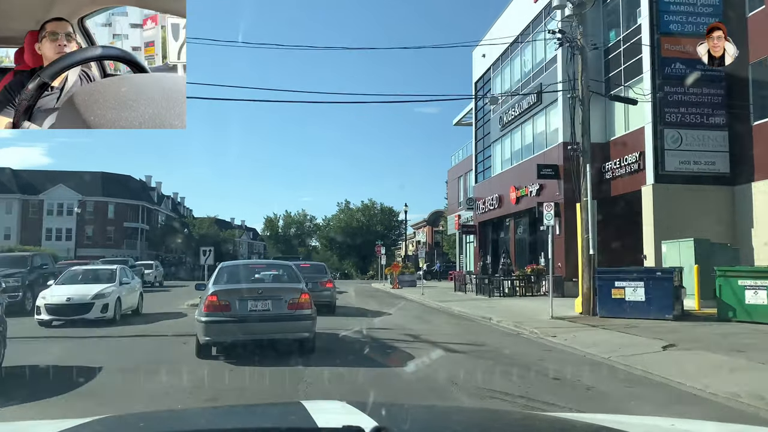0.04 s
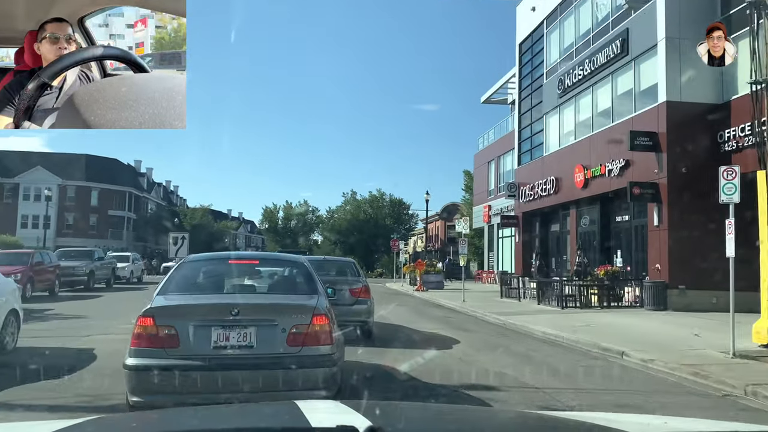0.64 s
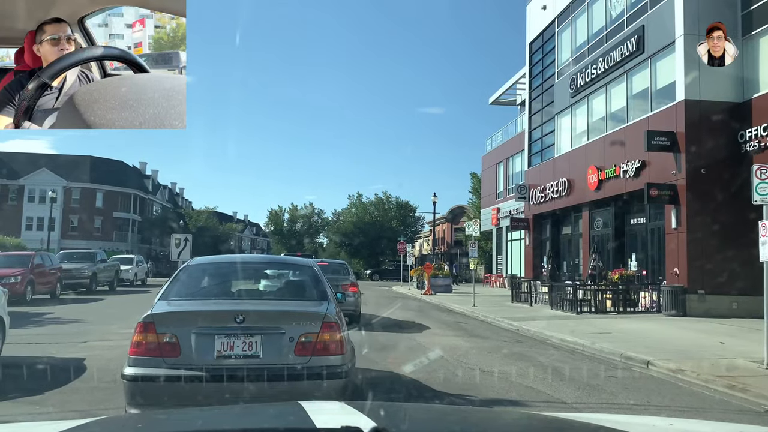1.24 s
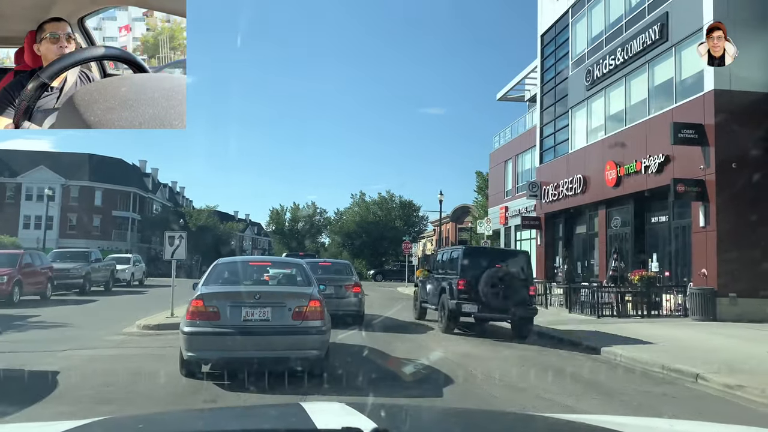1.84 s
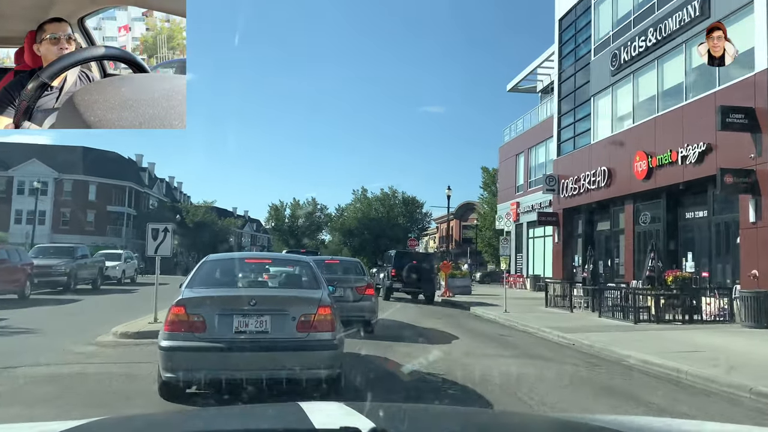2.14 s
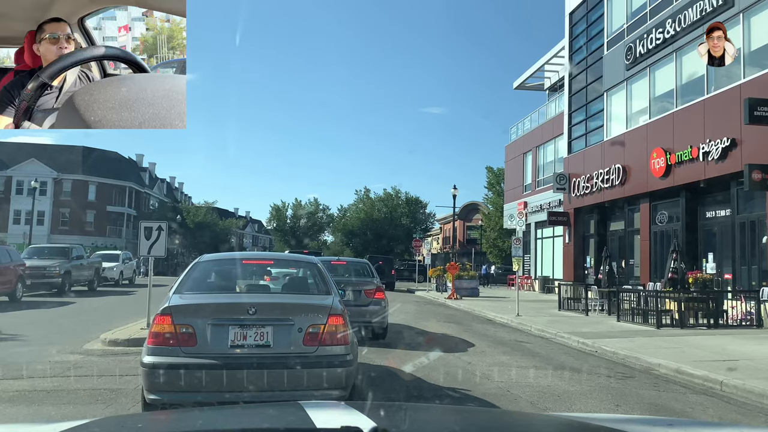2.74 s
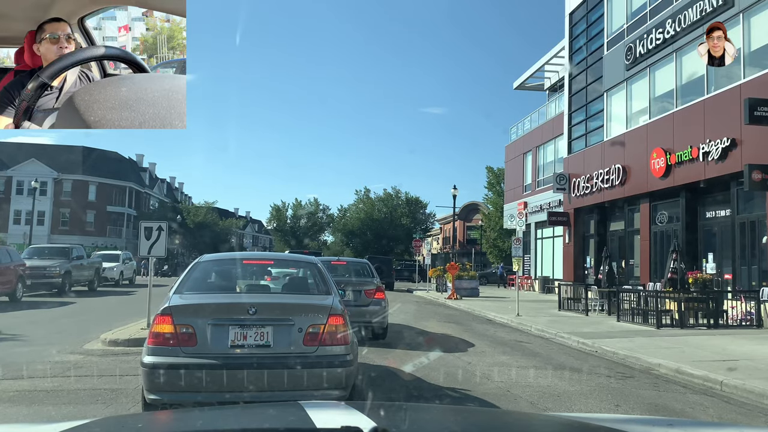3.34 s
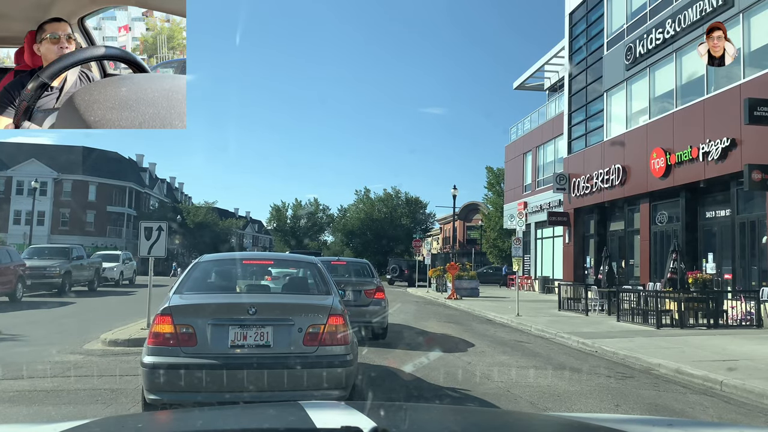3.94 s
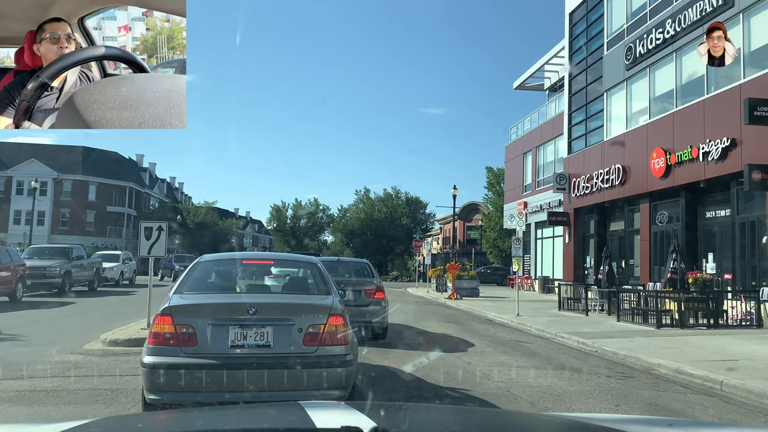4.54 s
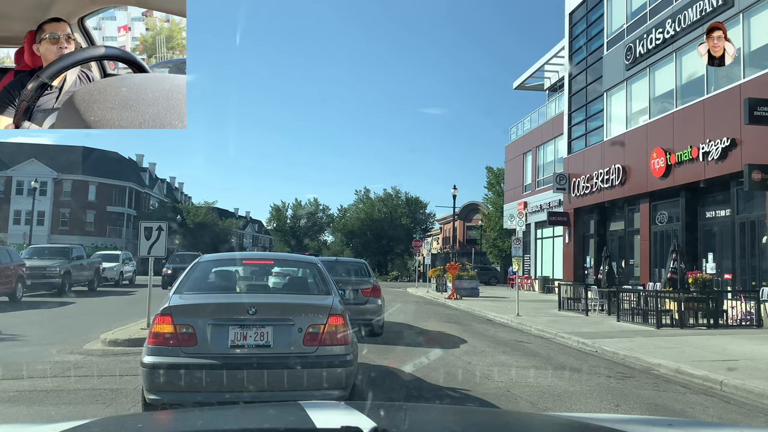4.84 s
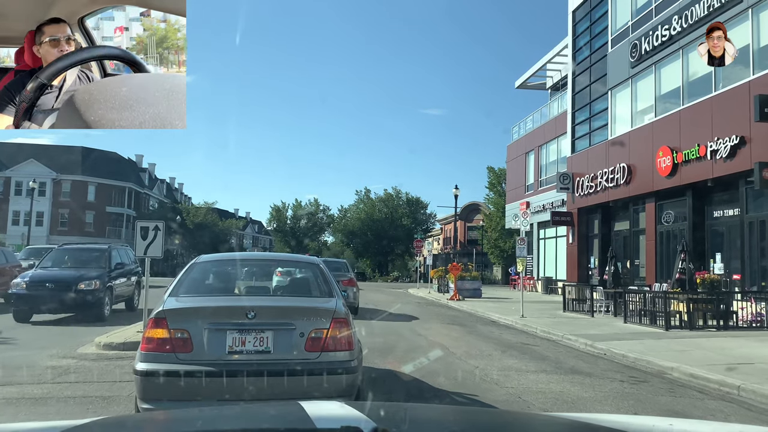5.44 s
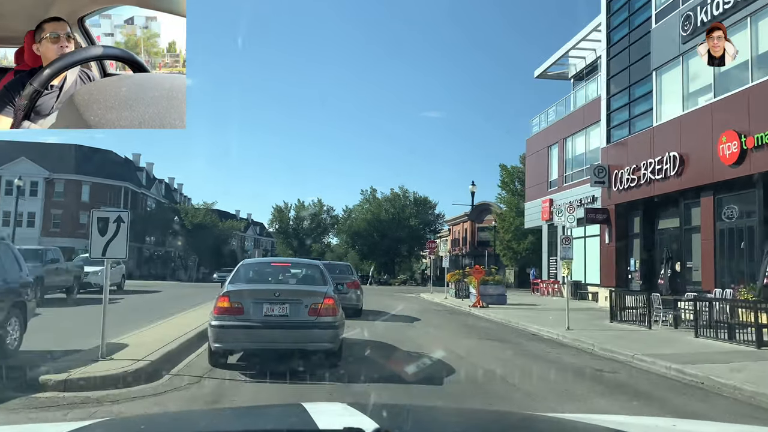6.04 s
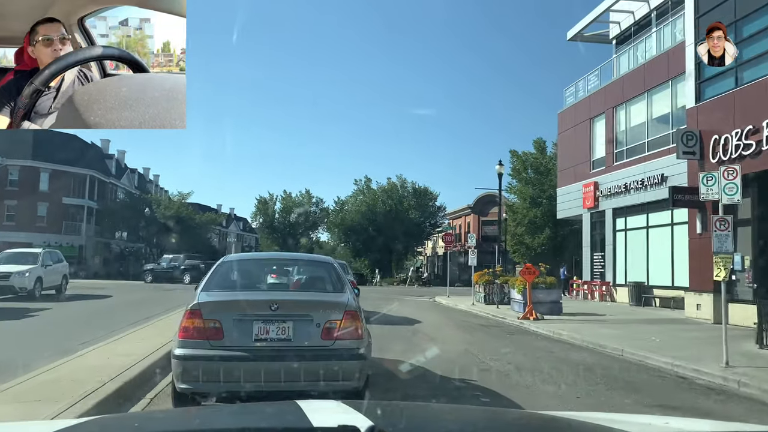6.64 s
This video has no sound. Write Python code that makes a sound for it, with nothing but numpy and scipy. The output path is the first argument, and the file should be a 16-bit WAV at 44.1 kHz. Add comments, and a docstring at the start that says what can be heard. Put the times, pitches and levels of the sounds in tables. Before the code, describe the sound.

Inside a creeping car, a steady engine hum swells twice over road rumble and vent air, with controls clicking close by.

```python
"""Car cabin in town traffic

Stereo, from inside a creeping car: the engine idles, is blipped once, then pulls away and drops back.
Its speed sets the throttle, the hum, the intake rush and how hard it rocks the body. Road rumble and
vent air lie beneath, with soft rustles and brake moans. Close to the microphone the controls knock
and click, and something electronic ticks faintly and very high at a fixed rate."""
import sys
import numpy as np
from scipy import signal
from scipy.fft import rfft, irfft, next_fast_len
from scipy.io import wavfile
from scipy.ndimage import uniform_filter1d

SR = 44100
rng = np.random.default_rng(int(sys.argv[2]) if len(sys.argv) > 2 else 0)


def inscribe(sig):
    """Save sig as 16-bit PCM at rate SR to the path in sys.argv[1].

    A 1-D sig is mono; a 2-D sig holds one channel per row.
    Samples are clipped to [-1, 1] before scaling.
    """
    pcm = np.round(np.clip(np.atleast_2d(sig).T, -1, 1) * 32767)
    wavfile.write(sys.argv[1], SR, pcm.astype(np.int16))


N = 295470
T = np.arange(N) / SR
IDLE_HZ, CYLINDERS = 53, 8  # firing rate at idle; firings per engine cycle

# spectrum of throttle hiss and rustles: f/Hz, relative level/dB
HISS_SPECTRUM = [(300, -26), (2000, 7), (4500, -3), (6000, -5), (9000, -9), (12000, -16.5), (16000, -14)]


def undb(db):
    """Decibels to gain."""
    return 10 ** (np.asarray(db) / 20)


def unit(x):
    """Scale to rms 1."""
    return x / np.sqrt(np.mean(x ** 2))


def at(points, hz):
    """Read (f/Hz, value) points on a log-frequency axis."""
    f, value = np.transpose(points)
    return np.interp(np.log(np.maximum(hz, 1)), np.log(f), value)


def colour(x, points):
    """Filter by (f/Hz, gain/dB) points."""
    size = next_fast_len(N)
    gain = undb(at(points, np.arange(size // 2 + 1) * SR / size))
    return irfft(rfft(x, size) * gain, size)[..., :N]


def walk(rate):
    """Smooth random drift that turns about rate times a second; spread near 1."""
    k = max(int(SR / rate), 2)
    start = rng.integers(k)
    steps = np.repeat(rng.standard_normal(N // k + 2), k)
    return 1.112 * uniform_filter1d(steps, k)[start:start + N]


def curve(table):
    """Join (t/s, value) points, sample by sample."""
    return np.interp(T, *np.transpose(table))


def swells(table):
    """Gain of bell-shaped swells from rows of peak t/s, length/s, level/dB."""
    return sum(undb(db) * np.exp(-2 * ((T - s) / length) ** 2) for s, length, db in table)


def add(track, s, sound):
    """Mix a sound into a track at s seconds."""
    part = track[..., int(s * SR):][..., :sound.shape[-1]]
    part += sound[..., :part.shape[-1]]


def diffuse(spectrum):
    """Noise filling the cabin: narrow in the upper bass, wide in the treble, ringing in the trim."""
    # faint resonances of ducts and trim: f/Hz, width/Hz, boost/dB
    trim = [(1538, 150, 4), (1956, 89, 5.5), (2450, 65, 1.5), (3030, 120, 5.5), (3565, 190, 5.5),
            (4150, 260, 3), (4840, 120, 4)]
    # width of the sound field: f/Hz, side minus mid/dB
    stereo_width = [(30, 2.5), (80, -11), (120, -27), (210, -37), (300, -27.5), (420, -2.5), (650, -11.5),
                    (1000, -6), (1250, 2.5), (1700, -2.5), (2600, 7), (4400, 5.5), (8000, -1), (16000, 0)]
    hz = np.geomspace(20, SR / 2, num=1000)
    rings_db = sum(db * np.exp(-2 * ((hz - f) / width) ** 2) for f, width, db in trim)
    mid, side = colour(rng.standard_normal((2, N)), np.transpose([hz, at(spectrum, hz) + rings_db]))
    side = colour(side, stereo_width)
    return unit(np.array([mid + side, mid - side]))


def vent_air(level_db=-60):
    """Steady air from the vents, all round the microphone."""
    # air noise: f/Hz, relative level/dB
    spectrum = [(25, -4.5), (85, -7), (130, 15.5), (190, 7), (600, 10.5), (1500, -6.5), (3000, -26.5),
                (4200, -29.5), (6000, -48), (7300, -24), (8100, -28.5), (9000, -53.5), (11000, -44),
                (16000, -47)]
    return undb(level_db) * diffuse(spectrum)


def rustles(crackle_db=4.5):
    """Soft rustles in the cabin: swells of hiss with a fast flicker."""
    # rustles: peak t/s, length/s, level/dB
    events = [(1.15, 0.41, -70), (5.31, 0.035, -66), (5.38, .1, -72.5), (5.58, 0.19, -72),
              (6.45, 0.071, -72), (6.65, 0.045, -67.5)]
    return swells(events) * undb(crackle_db * walk(120)) * diffuse(HISS_SPECTRUM)


def rumble(climb, roll, shudder, still_db=-57, road_db=-52, rise_db=-59, fall_db=-52, judder_db=1):
    """The body shakes a little at rest, more as the tyres roll, most as falling revs rock the engine."""
    # body rumble: f/Hz, relative level/dB
    spectrum = [(30, -38.5), (85, -46.5), (120, -22), (165, -6), (195, -4), (235, -0.5), (290, -1),
                (385, -4.5), (460, -8.5), (600, -15.5), (1000, -23.5), (2000, -40), (5000, -69)]
    rocking = undb(np.where(climb > 0, rise_db, fall_db)) ** 2 * np.abs(climb)
    power = undb(still_db) ** 2 + (undb(road_db) * roll) ** 2 + rocking + shudder ** 2
    return diffuse(spectrum) * np.sqrt(power) * undb(judder_db * walk(22.45))


def ticking(level_db=-50, weak_db=-4, burst_s=0.0043, tail_db=-11, tail_s=0.005, uneven_db=2.27):
    """Short, very high electronic bursts, strong and weak in turn."""
    # one tick: f/Hz, gain/dB
    spectrum = [(2500, -37), (4000, -7.5), (7000, -20), (9700, -10), (11300, -20), (12400, -9.5),
                (13200, -4.5), (14100, -15), (14700, 10.5), (15100, 5), (15700, 9.5), (16300, -19)]
    # width from reaching the two channels out of step: f/Hz, side minus mid/dB
    stereo_width = [(4000, 4.5), (8000, 0), (13200, -5), (14500, -0.5), (15600, 4.5)]
    first_s, gap_s, period_s = .0278, .0758, .14998
    gate = np.zeros(N)
    for start, db in ((first_s, 0), (first_s + gap_s, weak_db)):
        age = (T - start) % period_s
        tail = undb(tail_db) * np.exp(-np.abs(age - burst_s) / tail_s)
        gate += undb(db) * np.where(age < burst_s, 1, tail)
    left = colour(gate * undb(uneven_db * walk(10)) * rng.standard_normal(N), spectrum)
    shift_rad = 2 * np.arctan(undb(at(stereo_width, np.arange(N // 2 + 1) * SR / N)))
    right = irfft(rfft(left) * np.exp(1j * shift_rad), N)
    return undb(level_db) * np.array([left, right])


def brake_moans(wobble_rad=0.56):
    """A dragging brake pad sings one soft, unsteady note that glides."""
    # moans: peak t/s, length/s, level/dB, f/Hz, glide/(Hz per s)
    events = [(1.02, 0.1, -49.5, 523, -100), (2.916, 0.032, -51, 571.7, 800)]
    drift = wobble_rad * walk(60)
    out = np.zeros(N)
    for s, length, db, hz, glide in events:
        phase = 2 * np.pi * (hz + glide * (T - s) / 2) * (T - s)
        out += np.sqrt(2) * swells([(s, length, db)]) * np.sin(phase + drift)
    return out


def body_booms(wobble_rad=0.81):
    """A low body resonance swells briefly and unsteadily as the engine rocks on its mounts."""
    # booms: peak t/s, length/s, level/dB, f/Hz
    events = [(0.016, 0.035, -36.5, 200.3), (0.09, 0.064, -40.5, 240), (0.216, .02, -38.5, 247),
              (1.65, 0.077, -43, 240.3), (5.322, 0.027, -36.5, 204.2), (5.622, 0.032, -35, 244),
              (5.76, 0.026, -34.5, 215), (5.88, .05, -39, 212.3), (6.009, 0.024, -34.5, 262)]
    drift = wobble_rad * walk(60)
    return sum(np.sqrt(2) * swells([(s, length, db)]) * np.sin(2 * np.pi * hz * (T - s) + drift)
               for s, length, db, hz in events)


def blow(thud_db, middle_db, snap_db, pan_db, thud_hz=680, clack_hz=1130, snap_s=0.008,
         scatter=0.034, scatter_s=0.0078, attack_s=0.00099):
    """A blow rings the console and snaps; near surfaces scatter the ring. Gives stereo (ring, snap)."""
    # console modes: f/Hz, relative level/dB, t60/s
    console = [(256, -4.5, 0.047), (441, -17.5, 0.11), (595, -1, 0.036), (802, -0.5, 0.0048),
               (886, 4.5, 0.013), (1013, 2.5, 0.014), (1160, 12, 0.0096), (1284, -5, 0.014),
               (1510, -11.5, 0.025)]
    t = T[:SR // 5]
    hz, db, t60 = np.transpose(console)
    tuned = hz * (1 + 0.018 * rng.standard_normal(len(hz)))
    modes = np.sin(2 * np.pi * tuned[:, None] * t) * np.exp(-np.log(1000) * t / t60[:, None])
    gains = undb(db + np.select([hz < thud_hz, hz < clack_hz], [thud_db, middle_db]))
    onset = 1 - np.exp(-(t / attack_s) ** 2)  # the attack is softened over about a millisecond
    ring = gains @ modes * onset
    reflections = rng.standard_normal(len(t)) + .5 * rng.standard_normal((2, len(t)))
    paths = scatter * reflections * np.exp(-t / scatter_s)
    paths[:, 0] = 1  # direct sound
    ring = signal.fftconvolve(paths, ring[None], axes=1)[:, :len(t)]
    snap = undb(snap_db) * rng.standard_normal((2, len(t))) * np.exp(-t / snap_s)
    pan = undb(np.array([[pan_db], [-pan_db]]) / 2)
    return pan * np.array([ring / np.abs(ring).max(), snap])


def controls(rebound_s=0.011, rebound_thud_db=-0.5, knock_pan_db=-3.5):
    """Close by, a little right: knocks clack and rebound once; clicks snap and ring the low modes."""
    # dull knocks of lever and pedals: t/s, gain/dB, then relative thud/dB, middle/dB, snap/dB, rebound/dB
    knocks = [(.868, -24.5, -5.5, -5, -25.5, -22), (1.628, -37, 4, 2, -21, -1),
              (2.087, -43, -20, -5, -32, -12), (4.590, -20, -10.5, -1.5, -31.5, -31),
              (4.787, -45, -12, -10, -32, -20), (4.798, -29.5, -2, -3.5, -32, -4.5),
              (5.120, -24.5, -3, -6.5, -26, -20), (6.387, -33.5, -10, -5, -26, -22),
              (6.622, -23.5, 2, 0.5, -25.5, -8.5)]
    # sharper clicks of catches and trim: t/s, gain/dB, then relative thud/dB, snap/dB
    clicks = [(0.214, -49, 7, -2), (.911, -37, 5, -11), (4.649, -35, 7, -12), (5.169, -35.5, 8.5, -12.5),
              (6.461, -36.5, 8, -13.5), (6.576, -34, 16, -12.5), (6.647, -31, -5, -18)]
    # the ring of the small panel keeps mainly its middle: f/Hz, gain/dB
    ring_spectrum = [(70, -39), (200, 0), (400, 11), (1400, -4), (1900, -13), (3000, 1), (6000, -47)]
    # brightness of the snap: f/Hz, gain/dB
    snap_spectrum = [(100, -40), (700, -9), (1600, 12.5), (2100, 6), (2700, 0), (3700, -2.5), (5500, -15),
                     (9000, -17.5), (16000, -22)]
    track = np.zeros((2, 2, N))
    for s, db, thud_db, middle_db, snap_db, rebound_db in knocks:
        add(track, s, undb(db) * blow(thud_db, middle_db, snap_db, knock_pan_db))
        rebound = blow(thud_db + rebound_thud_db, middle_db, snap_db, knock_pan_db)
        add(track, s + rebound_s, undb(db + rebound_db) * rebound)
    for s, db, thud_db, snap_db in clicks:
        add(track, s, undb(db) * blow(thud_db, middle_db=3.5, snap_db=snap_db, pan_db=-1.5))
    rings, snaps = track
    return colour(rings, ring_spectrum) + colour(snaps, snap_spectrum)


def drive(flywheel_s=0.086, settle_s=0.072):
    """Firing rate, revs (octaves over idle), their smoothed climb (octaves a second) and throttle."""
    # engine settling, a blip, a long idle, pulling away: t/s, firing rate/Hz
    speed = [(0.0, 70.2), (0.1, 57.54), (0.2, 50.2), (0.32, 56.85), (0.481, 55.8), (0.989, 55.04),
             (1.105, 53.14), (1.187, 91), (1.24, 97.44), (1.305, 99.3), (1.40, 86.15), (1.51, 69.9),
             (1.59, 66.1), (1.682, 59.55), (2.085, 54.3), (4.435, 52.55), (5.25, 53.22), (5.33, 118),
             (5.40, 122.9), (5.565, 126.5), (5.62, 119.2), (5.69, 102.3), (5.777, 100.7), (5.95, 90.74),
             (6.06, 73.07), (6.12, 61.75), (6.2, 55.78), (6.38, 59.12), (6.56, 58), (6.64, 67.26),
             (6.7, 64.54)]
    hz = curve(speed)
    revs = np.log2(hz / IDLE_HZ)
    climb = uniform_filter1d(np.gradient(revs) * SR, int(settle_s * SR))
    # the flywheel makes the speed lag the pedal
    throttle = np.tanh(np.maximum(revs + flywheel_s * climb, 0))
    return hz, revs, climb, throttle


def uneven_firing(hz, lope=0.015, hunt=0.0025, stumble_s=0.0601, stumble_sag=0.02003):
    """Unequal cylinders make the crank surge once a cycle, most at idle; weak burns let the speed sag."""
    # weak burns at idle: t/s
    stumbles = [3.18, 3.62, 3.9, 4.33, 4.52]
    cycle = 2 * np.pi * np.cumsum(hz) / SR / CYLINDERS
    sag = stumble_sag * sum(np.exp(-2 * ((T - s) / stumble_s) ** 2) for s in stumbles)
    surge = (IDLE_HZ / hz) ** 2 * (lope * np.sin(cycle) + hunt * walk(16))
    return hz * (1 - sag + surge)


def intake_rush(phase, pulse=0.34, lope=0.17, flicker_db=0.84):
    """Intake and valve noise, throbbing with the firings."""
    # intake noise: f/Hz, relative level/dB
    spectrum = [(100, -22.5), (250, 0.5), (460, -1.5), (580, 8), (730, 1.5), (900, 3.5), (1080, -6.5),
                (1250, -2), (1400, -8), (1750, -11.5), (2400, -18), (3000, -27.5), (4500, -35), (9000, -46),
                (16000, -56)]
    throb = 1 + pulse * np.cos(2 * phase) + lope * np.cos(phase)
    noise = diffuse(spectrum) * throb * undb(flicker_db * walk(14))
    return unit(colour(noise, [(70, -34), (130, -3)]))  # bass cut


def hum(hz, phase, throttle, climb, strain, bite_db=14, bite_hz=1050, overrun_db=-1, pull_db=5,
        boom_db=1.5, waver_db=1.48, rough_db=1.03, smear_rad=0.12, judder=0.2):
    """Crank orders sweep through the cabin response; throttle lifts the high ones, strain the low."""
    # orders: multiple of firing rate (rounded for pitch), level/dB, throttle boost/dB, coasting boost/dB
    orders = [(2, -1.5, 0.5, 0.5), (3, -14, 4, 1.5), (3.97, 0.5, -1, 3.5), (5, -15, -6, 2),
              (6, -1.5, 1.5, -4.5), (7, -21, 2, -2), (7.9, -8, 0, 5), (9, -16.5, 1.5, -2),
              (10.1, -3.5, -3.5, -1.5), (12, -9, 1.5, 1), (14, -11.5, 3.5, 2), (16, -10.5, 1, 0),
              (18, -10, 0.5, -6.5), (20, -16, 5, 3.5), (22, -10.5, -2.5, -1.5), (24, -16, 0, -0.5),
              (30, -15, -4, -1.5)]
    # path from engine to cabin: f/Hz, gain/dB
    cabin = [(106, -23.5), (160, -2), (188, -8.5), (212, 0.5), (232, -2.5), (250, -3), (280, -4.5),
             (320, -2.5), (390, -1.5), (440, -4.5), (490, -9), (520, -2.5), (555, 2), (595, -3), (670, -2),
             (750, -6), (910, -2), (1040, -10.5), (1220, -9), (1400, -17.5), (2000, -30), (3000, -32)]
    # phase at the microphone: f/Hz, left ahead of right/rad
    left_lead = [(100, 0), (215, 0), (320, -.18), (430, -.9), (550, -.25), (650, -.25), (800, .15),
                 (1000, -.1), (1200, -1), (2000, -1.4)]
    overrun = np.maximum(-climb, 0)
    pull = np.tanh(np.maximum(climb, 0)) * throttle
    coasting = np.tanh(2 * overrun)
    out = np.zeros((2, N))
    for order, db, throttle_db, coasting_db in orders:
        f = np.round(order) * hz
        height = min(order / 10, 1)
        # uneven burns shake the high orders more than the low ones, most at idle
        shake_db = (waver_db + rough_db * height ** 2 * IDLE_HZ / hz) * walk(24)
        rasp_db = bite_db * throttle * np.clip(np.log2(f / bite_hz), 0, 1)
        low_db = boom_db * strain * (1 - height ** 2)
        # rising revs firm up the middle; falling revs soften the top and judder
        middle_db = pull_db * pull * np.sin(np.pi * height) ** 2
        top_db = overrun_db * height ** 2 * overrun
        load_db = throttle_db * throttle + coasting_db * coasting
        gain = undb(at(cabin, f) + db + shake_db + rasp_db + low_db + middle_db + top_db + load_db)
        gain *= 1 + judder * (1 - height / 2) * coasting * (np.sin(phase / 2) + walk(110))
        angle = np.round(order) * phase + smear_rad * height * walk(30) + rng.uniform(0, 2 * np.pi)
        lead = at(left_lead, f) / 2
        out += np.sqrt(2) * gain * np.sin([angle + lead, angle - lead])
    return out


def engine(hz, revs, climb, throttle, roll, strain, hum_db=-50, rush_db=-56.5, hiss_db=-78):
    """Hum and rush grow with the revs and with the load of rolling; the throttle hisses as it opens."""
    hz = uneven_firing(hz)
    phase = 2 * np.pi * np.cumsum(hz) / SR
    tone = hum(hz, phase, throttle, climb, strain) * undb(hum_db + 3.5 * revs + 4 * roll)
    rush = intake_rush(phase) * undb(rush_db + 4 * throttle ** 2 + 3.5 * revs ** 2 + 2 * roll)
    hiss = diffuse(HISS_SPECTRUM) * undb(hiss_db) * throttle ** 2
    return tone + rush + hiss


def scene():
    """Engine and cabin noise, a little louder on the right, with controls and ticking close by."""
    # the car creeps, all but stops, moves off: t/s, share of creeping pace
    pace = [(0, 0.92), (.7, 0.75), (1.7, 0.83), (3.1, 0.16), (5.2, 0.13), (6, 0.75), (6.7, 0.99)]
    # the drivetrain takes up load: peak t/s, length/s, rumble level/dB
    shudders = [(.04, 0.16, -39), (5.3, 0.07, -39.5), (5.77, 0.45, -41.5), (6.66, 0.14, -41.5)]
    # balance at the microphone: f/Hz, left minus right/dB
    balance = [(60, -0.5), (110, 0.0), (200, -0.5), (380, -2.0), (700, -1.0), (1290, -3.0), (2380, 0.5),
               (4400, 0.0), (8120, -0.5), (15000, -0.5)]
    hz, revs, climb, throttle = drive()
    roll, shudder = curve(pace), swells(shudders)
    background = vent_air() + rustles()
    motor = engine(hz, revs, climb, throttle, roll, strain=shudder / shudder.max())
    left, right = background + motor + rumble(climb, roll, shudder) + body_booms() + brake_moans()
    lean = np.array(balance) * [1, .5]  # half to each channel
    cabin = np.array([colour(left, lean), colour(right, lean * [1, -1])])
    return cabin + controls() + ticking()


def record(dry):
    """The recorder cuts the top steeply."""
    top_hz = 16500
    return signal.sosfilt(signal.ellip(8, .2, 70, top_hz, fs=SR, output="sos"), dry)


dry = scene()
out = record(dry)
inscribe(out)
```